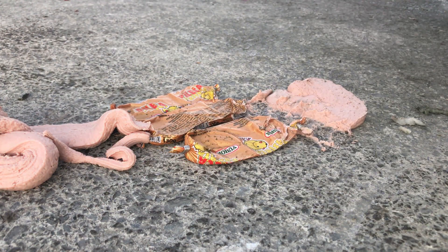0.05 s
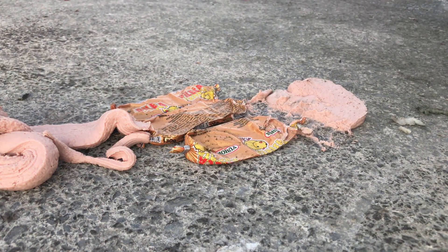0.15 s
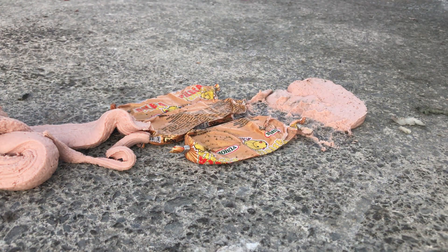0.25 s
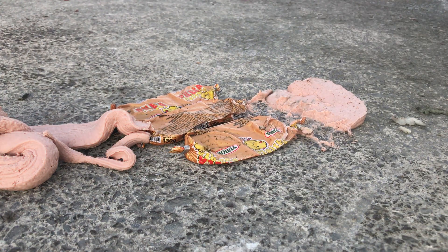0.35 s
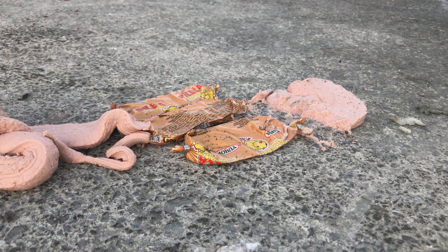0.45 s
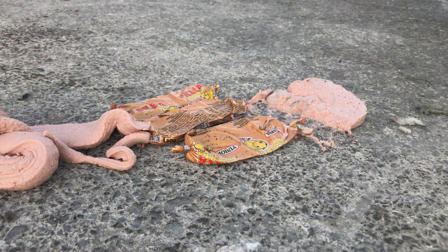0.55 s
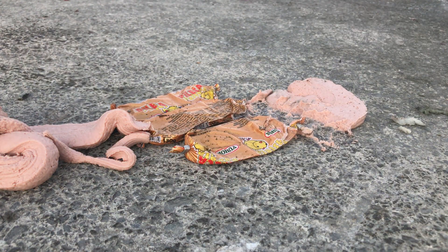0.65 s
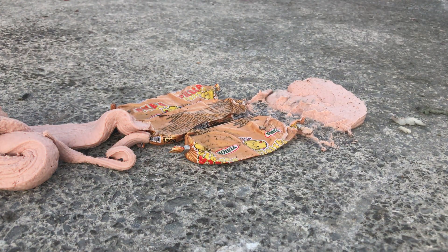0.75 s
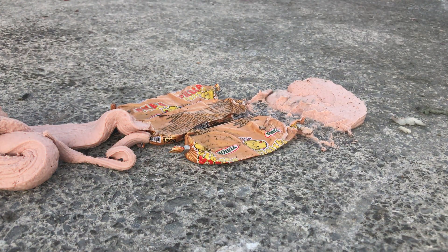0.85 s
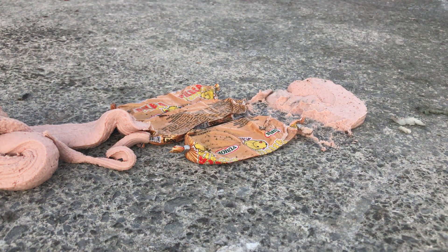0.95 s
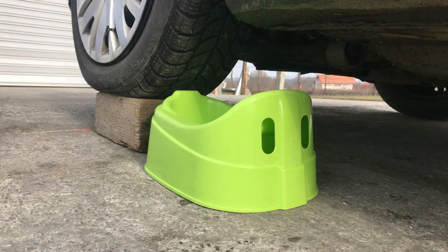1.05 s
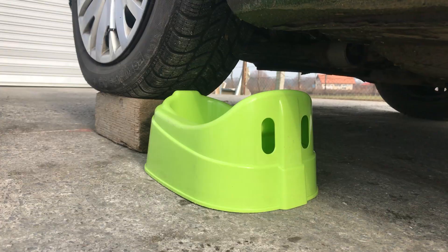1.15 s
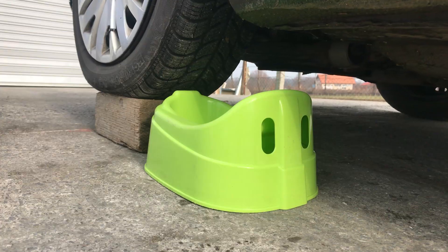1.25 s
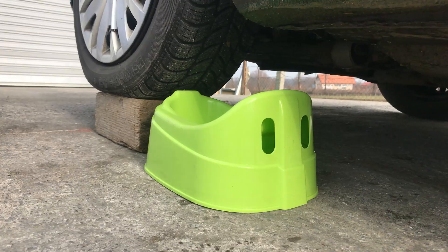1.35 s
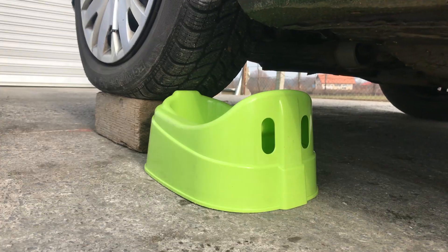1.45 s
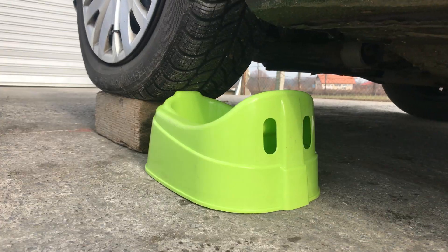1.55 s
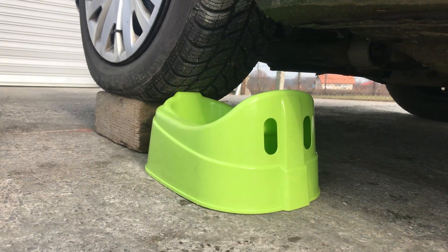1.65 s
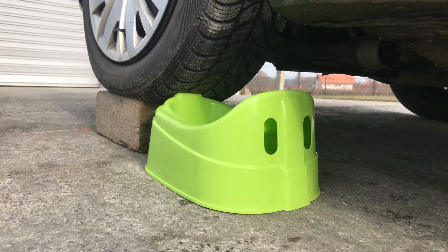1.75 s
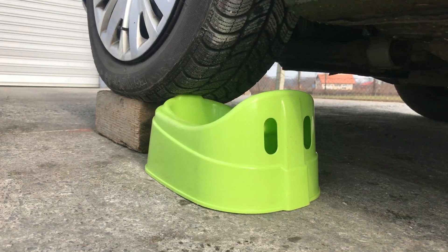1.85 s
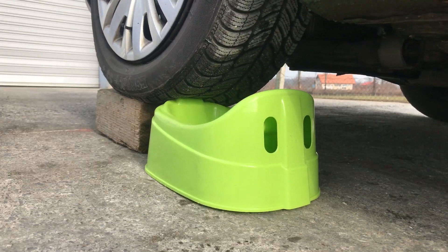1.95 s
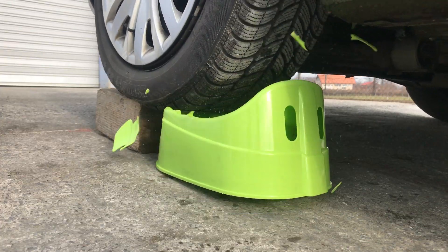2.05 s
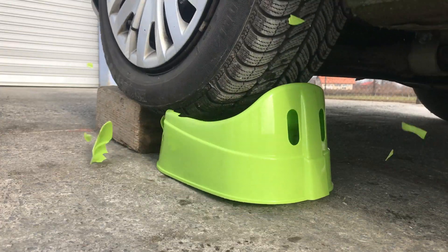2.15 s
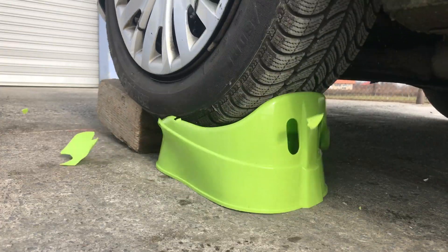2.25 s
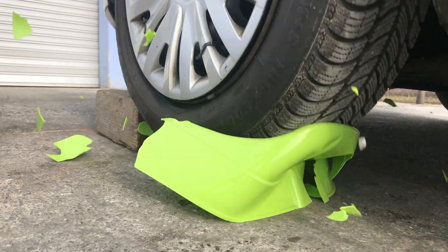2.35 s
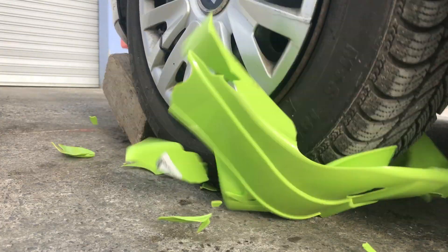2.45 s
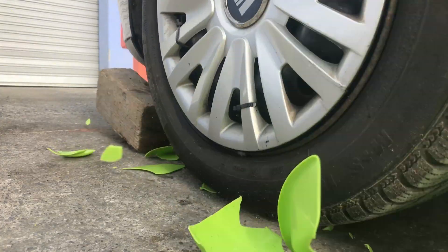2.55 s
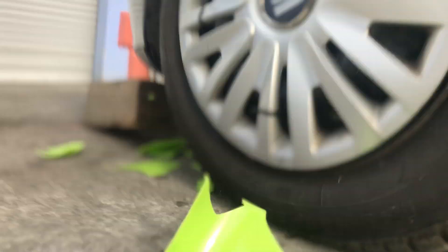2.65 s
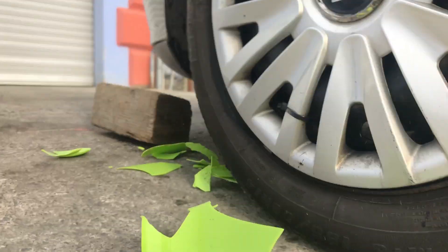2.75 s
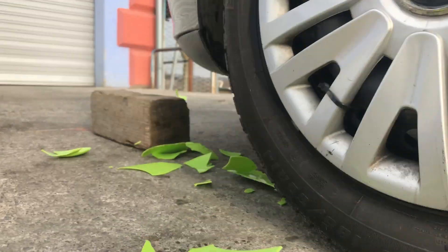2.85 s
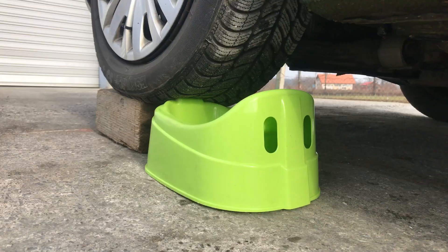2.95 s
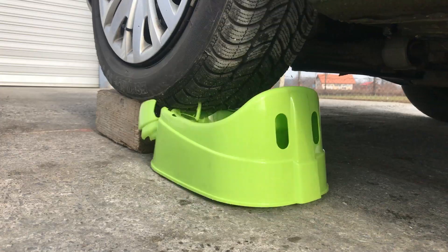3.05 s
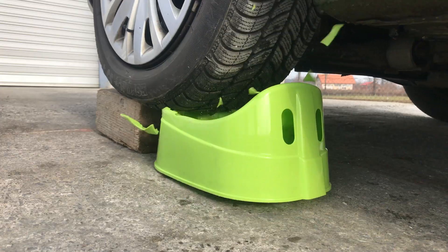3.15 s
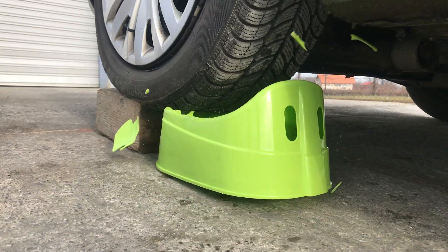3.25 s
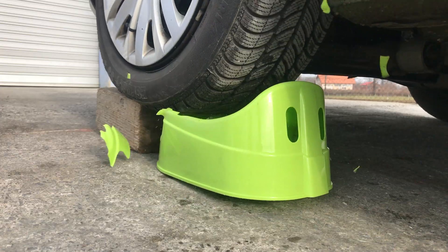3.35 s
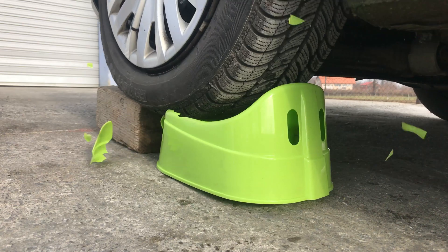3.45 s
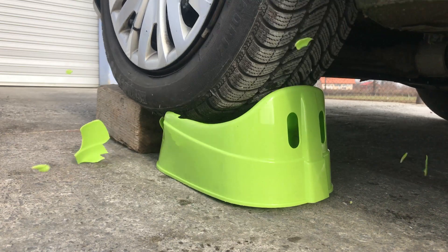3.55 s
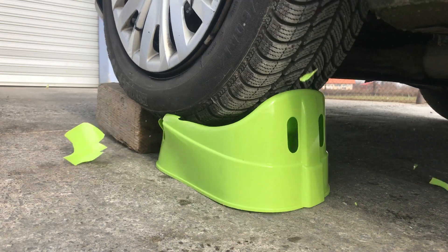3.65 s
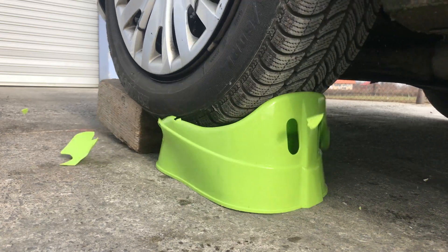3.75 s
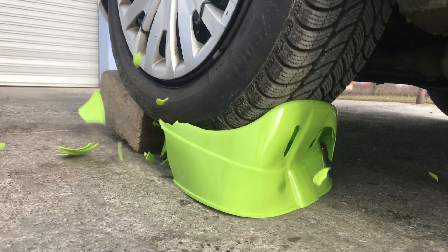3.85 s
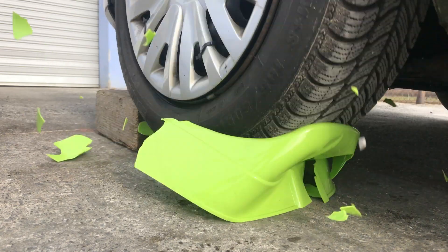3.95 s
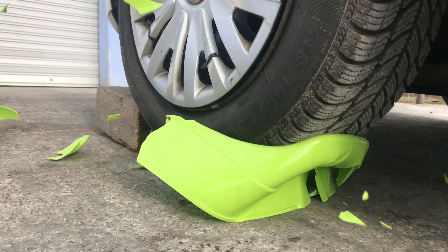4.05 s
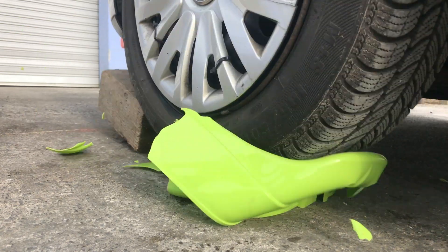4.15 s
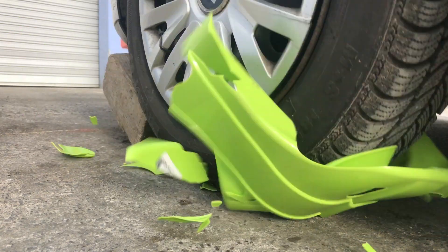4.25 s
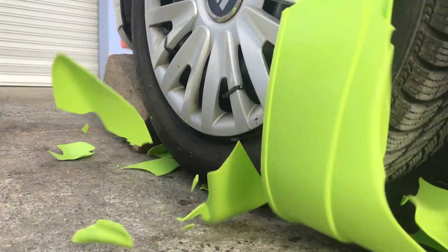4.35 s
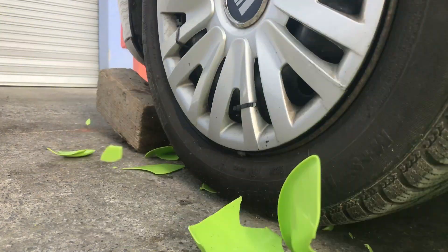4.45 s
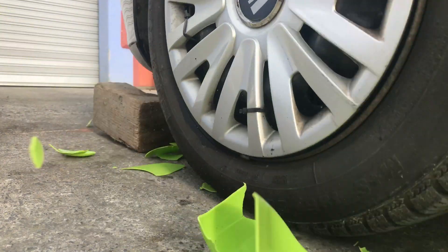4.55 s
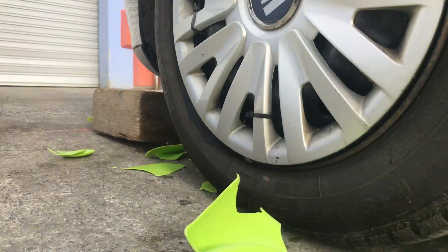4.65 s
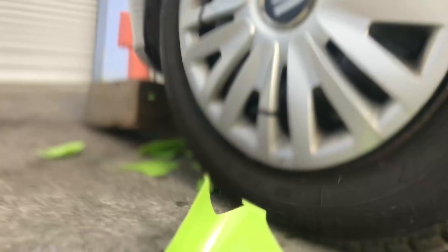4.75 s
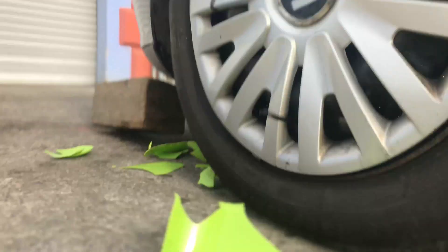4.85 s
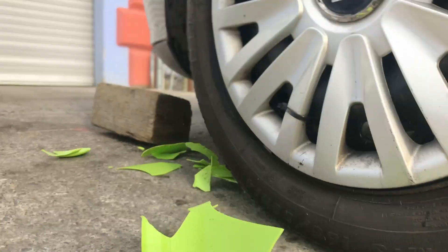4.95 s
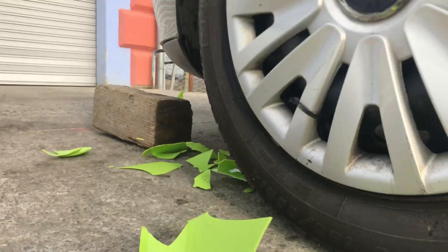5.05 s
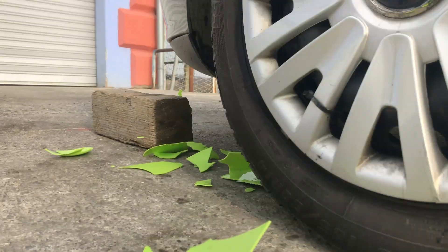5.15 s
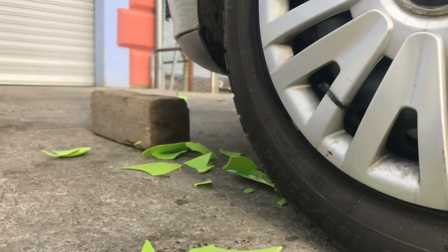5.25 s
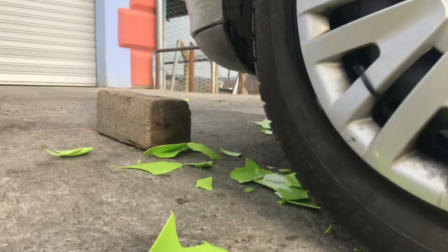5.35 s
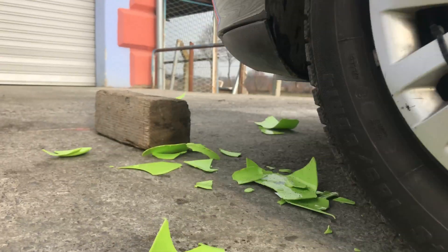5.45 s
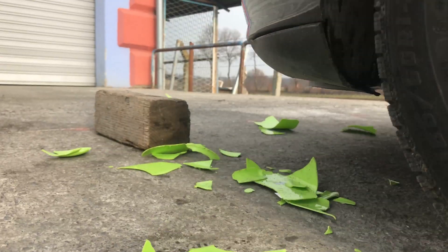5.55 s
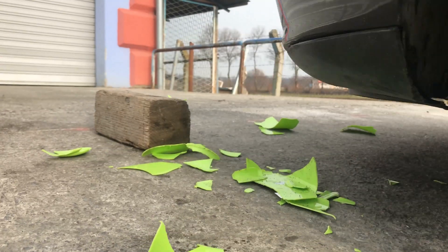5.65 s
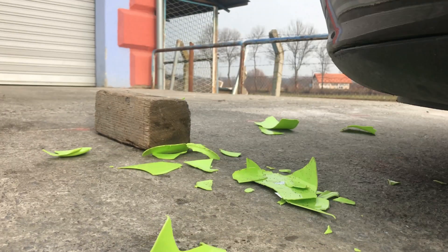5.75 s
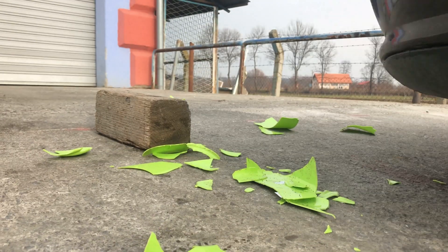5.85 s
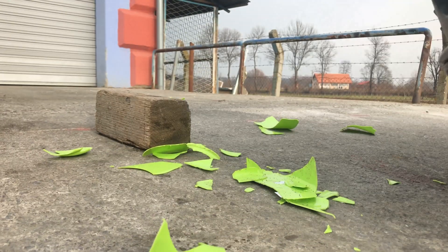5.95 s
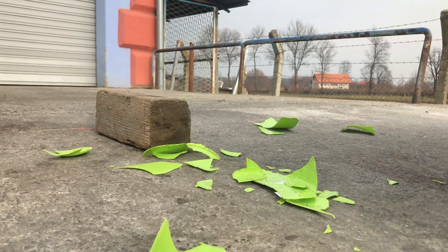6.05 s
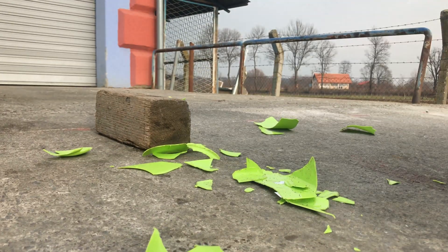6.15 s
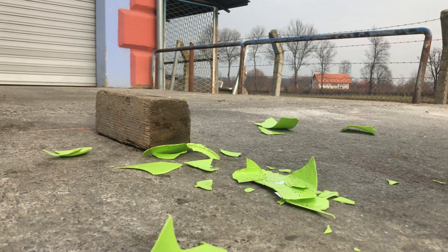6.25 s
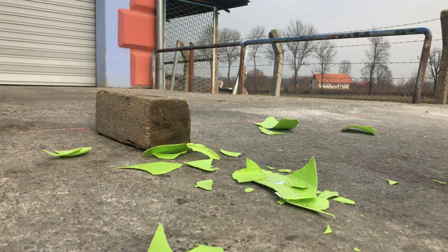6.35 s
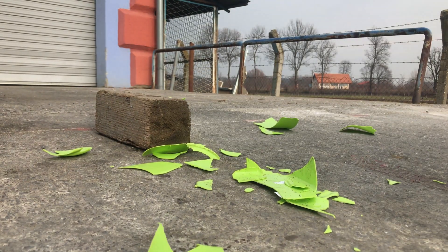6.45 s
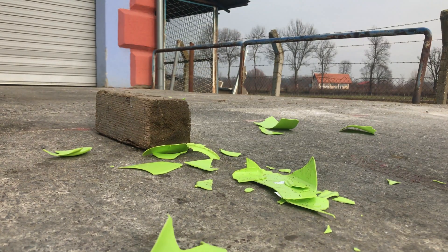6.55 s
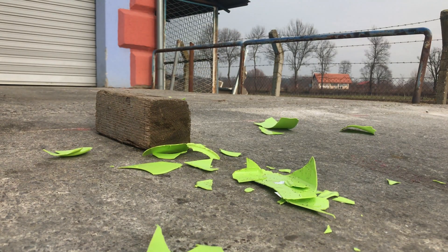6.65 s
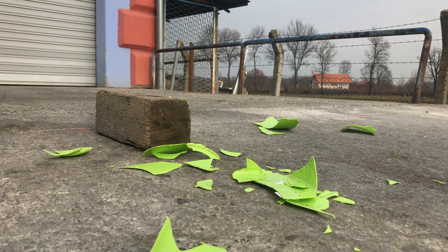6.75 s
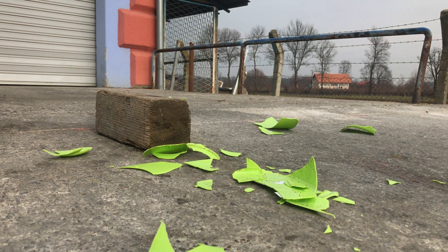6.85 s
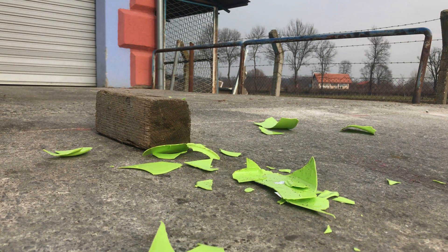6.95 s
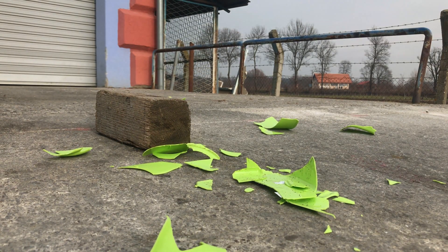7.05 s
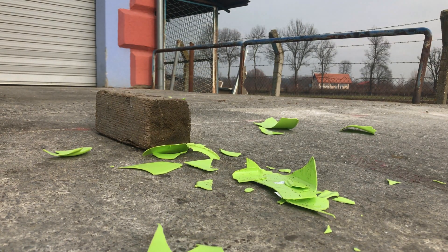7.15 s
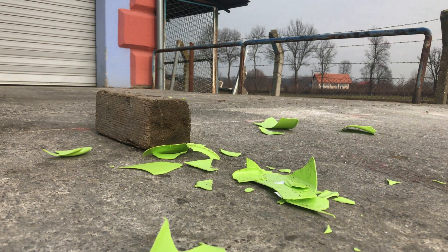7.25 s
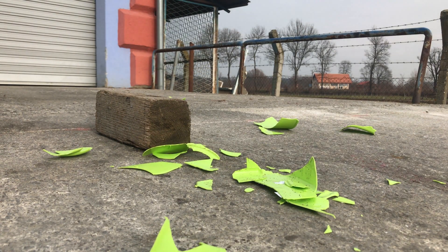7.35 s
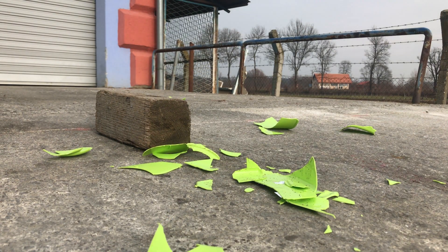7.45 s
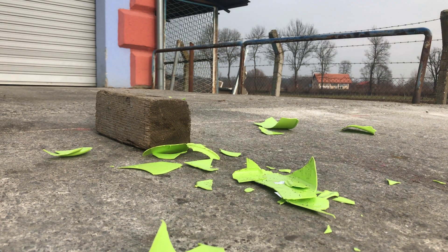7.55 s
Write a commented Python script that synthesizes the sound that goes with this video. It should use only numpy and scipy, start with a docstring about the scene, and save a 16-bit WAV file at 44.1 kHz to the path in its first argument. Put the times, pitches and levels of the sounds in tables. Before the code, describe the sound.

For the first 1.1 seconds a low, even engine hum sits near gritty concrete, with faint crunching and a few stone ticks, strongest just before the cut. The engine then turns uneven and rumbling. Around 1.7 a hollow plastic tub gives a dull creak and knocks. From 2.1 to 2.7 it shatters under the tyre: a loud pop, air thumps, dense sharp cracks, tearing and bright splinters, with short reverberation beneath the car, thinning to small ticks by 2.95. From 3 to 5.4 the same break returns slowed to less than half speed, darker and deeper, its crashes drawn out between about 3.2 and 4.6. Around 5.8 a hollow tyre roar swells over outdoor air and engine; shards snap and crunch, flatter and duller, until 6.5. Roar and idle gradually fade, with isolated stone ticks, until about 7.6.

```python
"""A hollow plastic tub on concrete breaks under a car rolling off a block: it buckles, splits and shatters.
Fractures are noise bursts through random plastic resonances; popping walls and pushed air are damped sines.
First comes a short shot of gritty ground with the engine humming nearby; grit and splinters are random spikes and ticks.
The break is replayed slower and lower; then the tyre rolls over the shards and the engine idles on.
Engine: two wandering partials plus rumble. Outdoor air and the tyre's roar: coloured noise."""
import sys
import numpy as np
from scipy import signal
from scipy.fft import rfft, irfft, next_fast_len
from scipy.io import wavfile
from scipy.ndimage import uniform_filter1d, minimum_filter1d, map_coordinates

SR = 44100
rng = np.random.default_rng(int(sys.argv[2]) if len(sys.argv) > 2 else 0)


def digitize_waveform(pressure):
    """Quantize a signal to 16-bit integers and store it at the path in sys.argv[1].

    Rows of a 2-D input are taken as channels; values are limited to [-1, 1].
    """
    field = np.atleast_2d(pressure).T
    bounded = np.clip(field, -1, 1)
    quanta = np.round(bounded * 32767).astype(np.int16)
    wavfile.write(sys.argv[1], SR, quanta)


N = 335846
CUT_S = 1.12  # end of the first shot
REPLAY_FROM_S, REPLAY_TO_S, REPLAY_SOURCE_S, REPLAY_SPEED = 2.9582, 5.39, 1.991, 0.4


def amp(db):
    """dB to gain."""
    return 10 ** (np.asarray(db) / 20)


def unit(x):
    """x at rms 1."""
    return x / np.sqrt(np.mean(x ** 2) + 1e-20)


def seconds(size):
    """Time of each sample [s]."""
    return np.arange(size) / SR


def along(points, hz):
    """Interpolate (frequency [Hz], value) points on a log frequency axis."""
    point_hz, value = np.transpose(points)
    return np.interp(np.log(hz + 1), np.log(point_hz + 1), value)


def wobble(rate_hz):
    """Smooth random curve, rate_hz knots a second."""
    knots = rng.standard_normal(int(N * rate_hz / SR) + 4)
    return map_coordinates(knots, [np.arange(N) * rate_hz / SR])


def filtered(x, response):
    """x times a response of frequency."""
    size = next_fast_len(N + SR // 2)
    hz = np.fft.rfftfreq(size, 1 / SR)
    return irfft(rfft(x, size) * response(hz), size)[:N]


def coloured(x, spectrum):
    """x weighted by the given spectrum, at rms 1."""
    return unit(filtered(x, lambda hz: amp(along(spectrum, hz))))


def low_passed(x, edge_hz):
    """Steep but smooth cut above the edge."""
    return filtered(x, lambda hz: 1 / (1 + (hz / edge_hz) ** 90))


def add(track, start_s, sound):
    """Mix a sound into the track at start_s."""
    part = track[round(start_s * SR):][:len(sound)]
    part += sound[:len(part)]


def spikes(size, rate_hz, spread_db):
    """Random tiny breaks, rate_hz a second, a few much larger than the rest; rms 1."""
    size_db = spread_db * np.minimum(rng.exponential(size=size), 4)
    sizes = amp(size_db) * rng.choice([-1, 1], size)
    return unit(sizes * (rng.random(size) < rate_hz / SR))


def swell_db(start_s, end_s, rise_db_per_s, fall_db_per_s):
    """Attack, hold at 0 dB from start to end, release."""
    t = seconds(N)
    return -rise_db_per_s * np.maximum(start_s - t, 0) - fall_db_per_s * np.maximum(t - end_s, 0)


# tyre bearing on grit and splinters; row 1: bare gritty ground, then: creeping off the block, rim splitting,
# tub flattened, settling on the wreck, dragging shards, rolling away
# (start [s], end [s], grit level [dB], splinter level [dB], fade after end [dB/s])
TYRE_LOADS = [(0, 0.07, -56.5, -59, 8), (1.72, 2.078, -65.5, -82, 100), (2.115, 2.317, -48, -48, 100),
              (2.36, 2.627, -40, -31, 152), (2.773, 5.478, -61, -50, 79), (5.81, 6.34, -49.5, -48.5, 72),
              (5.406, 6.505, -52, -75, 10.5)]


def crunch_levels(rise_db_per_s=501.5):
    """Grit and splinter levels [dB]: both follow the tyre's load; the first stretch ends at the cut."""
    levels = []
    for start_s, end_s, grit_db, splinter_db, fade_db_per_s in TYRE_LOADS:
        swell = swell_db(start_s, end_s, rise_db_per_s, fade_db_per_s)
        levels.append(swell + np.array([[grit_db], [splinter_db]]))
    first, *later = levels
    return np.where(seconds(N) < CUT_S, first, np.max(later, axis=0))


# weighting of gritty rolling (frequency [Hz], level [dB])
GRIT_SPECTRUM = [(40, -28.5), (150, -6), (320, -2), (450, -10), (620, 5), (1400, 1.5), (3500, -5.5),
                 (7000, -14), (15000, -25)]


def rolling(roll_db, clump_db=2, patch_db=4):
    """Grit crunches in clumps under the tread; short random bands stand out, as dragged shards ring."""
    z = signal.stft(spikes(N, rate_hz=3500, spread_db=2.0), nperseg=256)[2]
    patches = uniform_filter1d(rng.standard_normal(z.shape), size=3, axis=0)  # across frequency
    patches = uniform_filter1d(patches, size=6, axis=1)  # across time
    scrape = signal.istft(z * amp(patch_db * unit(patches)), nperseg=256)[1][:N]
    return amp(roll_db + clump_db * wobble(45)) * coloured(scrape, GRIT_SPECTRUM)


def splinters(debris_db, centre_hz=2700, spread_octaves=0.5, mode_octaves=0.59, t60_cycles=7,
              size_db=5.5, count=3500):
    """Small splinters tick at random moments, each with four damped modes scattered around its own pitch."""
    start = rng.integers(0, N, (count, 1))
    pitch_hz = centre_hz * 2 ** (spread_octaves * rng.standard_normal((count, 1)))
    size = amp(size_db * np.minimum(rng.exponential(size=(count, 1)), 4))
    t = seconds(size=220)
    ticks = np.zeros((count, len(t)))
    for offset in rng.standard_normal(size=(4, count, 1)):
        hz = np.minimum(pitch_hz * 2 ** (mode_octaves * offset), SR / 3)
        sign = rng.choice([-1, 1], (count, 1))
        ticks += sign * np.sin(2 * np.pi * hz * t) * amp(-60 * hz * t / t60_cycles)
    positions = start + np.arange(len(t))
    shower = np.bincount(positions.ravel(), (size * ticks).ravel(), N)[:N]
    return amp(debris_db) * unit(shower)


def firing(hz, drift, waver_db, overtone_db=-14):
    """Low note of a four-cylinder engine at idle: two partials, wandering in pitch and level; rms about 1."""
    phase = 2 * np.pi * np.cumsum(hz * (1 + drift * wobble(5.5))) / SR
    note = np.sin(phase) + amp(overtone_db) * np.sin(2 * phase)
    return unit(note) * amp(waver_db * wobble(12))


# weighting of exhaust rumble (frequency [Hz], level [dB])
RUMBLE_SPECTRUM = [(15, -5), (30, -13), (60, -0.5), (110, -0.5), (200, -19.5), (320, -10.5), (800, -55)]
# overall engine level (time [s], level [dB])
ENGINE_LEVELS = [(0, -48.5), (.4, -47.5), (.8, -42.5), (1.3, -48.5), (2.05, -48.5), (2.85, -71.5),
                 (5.6, -65.5), (5.87, -44.5), (6.2, -46.5), (7.62, -54.5)]


def engine(near_db=0, near_rumble_db=-10, labouring_db=-6, labouring_rumble_db=-2):
    """Firing note plus exhaust rumble: even idle in the first shot, uneven under load after it."""
    engine_db = np.interp(seconds(N), *np.transpose(ENGINE_LEVELS))
    rumble = coloured(rng.standard_normal(N), RUMBLE_SPECTRUM)
    steady = firing(hz=59.2, drift=0.003, waver_db=0.8)
    near = amp(near_db) * steady + amp(near_rumble_db) * rumble
    uneven = firing(hz=64.3, drift=0.018, waver_db=4.0)
    labouring = amp(labouring_db) * uneven + amp(labouring_rumble_db) * rumble
    return amp(engine_db) * np.where(seconds(N) < CUT_S, near, labouring)


# weighting of outdoor air and roar (frequency [Hz], level [dB])
AIR_SPECTRUM = [(30, -15), (200, 10), (400, 1.5), (1200, 0), (2200, -13), (4000, -22), (7000, -24.5),
                (10000, -29), (16000, -26.5)]
AIR_DB = -54.5
ROAR_PEAK_S, ROAR_DB, ROAR_RISE_DB_PER_S, ROAR_FALL_DB_PER_S = 5.85, -45.5, 26, 7.5


def yard(flutter_db=-1.07):
    """Outdoor air; after the replay the tyre's hollow roar, swelling and fading as it passes."""
    roar_db = ROAR_DB + swell_db(ROAR_PEAK_S, ROAR_PEAK_S, ROAR_RISE_DB_PER_S, ROAR_FALL_DB_PER_S)
    level_db = np.where(seconds(N) < REPLAY_TO_S, AIR_DB, roar_db)
    return amp(level_db + flutter_db * wobble(6.5)) * coloured(rng.standard_normal(N), AIR_SPECTRUM)


def swing(hz, rise_s, t60_s):
    """Damped low mode that swells over the rise, then decays."""
    t = seconds(size=12000)
    envelope = np.minimum(t / rise_s, 1) * amp(-60 * np.maximum(t - rise_s, 0) / t60_s)
    return np.sin(2 * np.pi * hz * t) * envelope


# shell walls popping through, or dull knocks (time [s], level [dB], pitch [Hz], t60 [s])
WALL_POPS = [(.114, -28, 319, 0.027), (1.122, -37.5, 220, 0.11), (1.660, -21, 377, 0.057),
             (1.676, -25.5, 711, 0.086), (1.684, -19, 218, 0.069), (2.078, -23, 676, 0.043),
             (2.0885, -4.5, 610, 0.023), (2.1765, -12.5, 537, 0.012), (2.3275, -17.5, 810, .014),
             (2.4255, -10, 664, 0.013), (2.7645, -28.5, 948, .025), (6.652, -39, 287, 0.033)]
# air pushed out as the shell gives way (time [s], level [dB], pitch [Hz])
AIR_THUMPS = [(2.096, -13, 83.5), (2.11, -8, 61.3), (2.369, -8.5, 78), (2.401, -16, 108.2),
              (2.441, -14, 67.9), (2.494, -22.5, 83), (2.54, -13.5, 90), (2.561, -15, 98.5),
              (2.618, -17, 60), (2.668, -26, 62)]


def buckling(rise_per_t60=0.15):
    """Walls pop through with a hollow note; the collapsing tub pushes out air."""
    out = np.zeros(N)
    for s, db, hz, t60_s in WALL_POPS:
        add(out, s, amp(db) * swing(hz, rise_per_t60 * t60_s, t60_s))
    for s, db, hz in AIR_THUMPS:
        add(out, s, amp(db) * swing(hz, rise_s=0.005, t60_s=0.034))
    return out


def release(t60_s, click=0.49, flutter=0.88, rise_s=0.00052, usual_t60_s=0.023):
    """One sharp release, then dense, quickly damped modes; energy 1."""
    t = seconds(size=3000)
    force = rng.standard_normal(len(t)) * amp(-60 * t / t60_s) * (1 - np.exp(-t / rise_s))
    # short t60: a piece pinned under the tyre is nearly all click
    force *= flutter * t60_s / usual_t60_s / np.linalg.norm(force)
    force[0] += click
    return force / np.linalg.norm(force)


# base response of a piece (frequency [Hz], level [dB])
PIECE_SPECTRUM = [(30, -26), (120, -4.5), (280, -1.5), (550, 1), (1300, 1), (2500, -1), (4200, -0.5),
                  (7000, -2), (10500, -4.5), (14000, -2), (19000, -1.5)]


def shard(force, ring_hz, ring_db, body_db, fizz_db, ring_width=0.25, modes_db=3, size=4096):
    """A piece answers a force: one main resonance, low body, treble fizz and random small modes."""
    hz = np.fft.rfftfreq(size, 1 / SR)
    tilt = along([(650, body_db), (1600, 0), (3200, 0.003), (9000, fizz_db), (16000, 1.57 * fizz_db)], hz)
    ring = ring_db * np.exp(-0.5 * (np.log((hz + 1) / ring_hz) / ring_width) ** 2)
    knots_hz = np.geomspace(300, SR / 2, 40)
    # no two pieces have the same shape
    modes = modes_db * np.interp(hz, knots_hz, rng.standard_normal(len(knots_hz)))
    response_db = along(PIECE_SPECTRUM, hz) + tilt + ring + modes
    cepstrum = irfft(np.log(amp(response_db)))
    cepstrum[1:size // 2] *= 2  # minimum phase: nothing sounds before the break
    cepstrum[size // 2 + 1:] = 0
    impulse = irfft(np.exp(rfft(cepstrum)))
    return signal.fftconvolve(force, impulse)


# stones ticking on concrete (time [s], level before gain [dB], ring [Hz])
STONE_TICKS = [(0.1158, -37, 560), (0.2012, -44, 1000), (.332, -41.5, 1990), (.76, -52, 2800),
               (0.8253, -48, 1900), (1.0488, -30, 1420), (1.0683, -35, 1540), (6.6192, -41, 1520),
               (6.6772, -44, 1290), (6.85, -41.5, 1360), (7.3917, -46, 1265)]


def pebbles(ring_db=14, ring_width=0.3, body_db=2, fizz_db=-19, t60_s=0.013, gain_db=22.0):
    """Small stones tick with one broad ring and little treble."""
    out = np.zeros(N)
    for s, db, hz in STONE_TICKS:
        tick = shard(release(t60_s), hz, ring_db, body_db, fizz_db, ring_width)
        add(out, s, amp(db + gain_db) * tick)
    return out


def volley(t, rate_hz, spread_db, t60_s, count=5):
    """Tiny fractures shared among a few pieces, each with its own short ring; rms 1."""
    rings = rng.standard_normal((count, len(t))) * amp(-60 * t / t60_s)
    total = np.zeros(len(t))
    for ring in rings:
        total += signal.fftconvolve(spikes(len(t), rate_hz / count, spread_db), ring)[:len(t)]
    return unit(total)


def running_crack(length_s, release_t60_s=0.035, fade_db=4):
    """A volley of tiny fractures that weakens as the stress is let go."""
    t = seconds(size=3500)
    stress_db = fade_db * (0.5 - t / length_s) - 60 * np.maximum(t - length_s, 0) / release_t60_s
    return volley(t, rate_hz=1800, spread_db=2.5, t60_s=0.011) * amp(stress_db)


CREAK_S, CREAK_LENGTH_S, CREAK_DB, CREAK_HZ = 1.661, 0.028, -31, 393


def creak(ring_db=2, body_db=24, fizz_db=-16):
    """The unbroken tub slips under the load: a short dull volley through the whole hollow shell."""
    out = np.zeros(N)
    slip = shard(running_crack(CREAK_LENGTH_S), CREAK_HZ, ring_db, body_db, fizz_db)
    add(out, CREAK_S, amp(CREAK_DB) * slip)
    return out


# a stronger break frees a larger piece: more body, less distinct ring (dB per dB above usual)
USUAL_DB, BODY_PER_DB, RING_PER_DB = -15, 0.2577, -0.21
# shards pressed flat on the concrete sound duller
FLAT_FROM_S, FLATTEN_S, FLAT_BODY_DB, FLAT_FIZZ_DB = 5.33, 0.94, 5, -12


def piece_tone(s, db, ring_db, body_db, fizz_db):
    """Ring, body and fizz [dB] of a piece, from the strength of its break and how flat it is pressed."""
    size_db = db - USUAL_DB
    flat = np.clip((s - FLAT_FROM_S) / FLATTEN_S, 0, 1)
    return (ring_db + RING_PER_DB * size_db,
            body_db + BODY_PER_DB * size_db + FLAT_BODY_DB * flat,
            fizz_db + FLAT_FIZZ_DB * flat)


# running cracks, ground shards (time [s], length [s], level [dB], ring [Hz])
CRACK_RUNS = [(2.071, 0.017, -29, 704), (2.096, 0.031, -7.5, 1630), (2.125, 0.021, -21.5, 1360),
              (2.151, .015, -21.5, 645), (2.365, .019, -17, 4420), (2.384, 0.028, -5, 565),
              (2.417, .011, -19, 810), (2.432, .005, -21, 680), (2.456, 0.007, -33, 570),
              (2.533, 0.0047, -9.5, 716), (2.542, 0.017, -16, 680), (2.5647, .016, -6.5, 1540),
              (2.585, 0.029, -25, 1020), (5.406, .025, -34.5, 640), (5.782, 0.011, -27, 700),
              (5.872, 0.017, -31.5, 1720), (5.883, 0.0095, -19, 5700), (5.901, 0.018, -36, 785),
              (5.94, 0.011, -28.5, 328), (5.993, 0.011, -24.5, 1300), (6.01, 0.024, -37, 1360),
              (6.051, 0.025, -30.5, 4050), (6.104, 0.022, -28.5, 4200), (6.259, 0.03, -28, 1600),
              (6.331, 0.0055, -33, 1720), (6.369, 0.05, -39, 890)]


def tears(ring_db=5, body_db=1.0, fizz_db=-7):
    """Cracks run through the tub, and later through its shards."""
    out = np.zeros(N)
    for s, length_s, db, hz in CRACK_RUNS:
        tone = piece_tone(s, db, ring_db, body_db, fizz_db)
        add(out, s, amp(db) * shard(running_crack(length_s), hz, *tone))
    return out


# single fractures (time [s], level before gain [dB], ring [Hz], t60 [s])
FRACTURES = [(2.0932, -3.5, 1200, 0.03), (2.142, -17.5, 570, 0.021), (2.1645, -21.5, 1000, 0.031),
             (2.2097, -20, 480, .033), (2.2266, -32, 762, 0.095), (2.255, -28, 1445, 0.035),
             (2.2833, -7.5, 1309, 0.049), (2.2899, -15.5, 4500, 0.095), (2.3264, -21, 951, 0.07),
             (2.362, -2.5, 1450, 0.067), (2.3823, -11, 452, 0.076), (2.4248, -20.5, 743, 0.04),
             (2.4398, -7.5, 700, 0.031), (2.4534, -15.5, 2390, 0.081), (2.4908, -6.5, 567, 0.041),
             (2.5102, -13, 700, 0.026), (2.5238, -20, 640, 0.067), (2.5406, -3.5, 1950, 0.015),
             (2.592, -11.5, 1140, 0.018), (2.6171, -8.5, 1635, 0.024), (2.6498, -33.5, 5850, 0.022),
             (2.6685, -21.5, 3250, 0.012), (2.6955, -22, 922, .027), (2.738, -39, 2050, .03),
             (2.767, -30, 994, 0.046), (2.7906, -34.5, 1096, 0.065), (2.803, -31, 4350, .012),
             (2.8342, -21.5, 3310, 0.031), (2.8785, -33.5, 3565, 0.025), (2.8856, -30, 2400, .022),
             (2.9307, -34.5, 2920, 0.017), (2.9504, -35, 756.5, 0.049), (2.9596, -31, 5740, 0.0076),
             (5.3937, -29.5, 6320, 0.0071), (5.4382, -34, 6300, 0.027), (5.4651, -26, 600, 0.12),
             (5.5353, -30, 4114, 0.025), (5.563, -29, 410, .02), (5.797, -26.5, 4100, 0.03),
             (5.8965, -22, 620, 0.021), (6.1468, -27.5, 4090, 0.02), (6.2393, -16, 4600, 0.014),
             (6.2781, -18.5, 1540, 0.013), (6.295, -23.5, 1286, 0.027), (6.3076, -27, 455, 0.027),
             (6.3599, -27, 1620, 0.02), (6.4545, -32, 720, 0.038)]


def snaps(ring_db=6.0, body_db=0.0, fizz_db=-5, gain_db=23.0):
    """Each snap lets go of one piece of plastic at once."""
    out = np.zeros(N)
    for s, db, hz, t60_s in FRACTURES:
        tone = piece_tone(s, db, ring_db, body_db, fizz_db)
        add(out, s, amp(db + gain_db) * shard(release(t60_s), hz, *tone))
    return out


# reverberation under the car (frequency [Hz], t60 [s])
UNDERBODY_T60 = [(100, 0.22), (400, 0.21), (1000, 0.097), (3000, 0.15), (8000, 0.19), (16000, 0.17)]


def underbody(x):
    """Short reverberation between the car's floor and the concrete: noise decaying per frequency."""
    hz, t, z = signal.stft(rng.standard_normal(SR // 3), SR, nperseg=256)
    decay = amp(-60 * t / along(UNDERBODY_T60, hz)[:, None])
    tail = signal.istft(z * decay, SR, nperseg=256)[1]
    delayed = np.pad(tail / np.linalg.norm(tail), (SR // 300, 0))
    return signal.fftconvolve(x, delayed)[:N]


def scene(wet_db=-15):
    """Plastic and grit sound under the car; the engine and the yard lie behind them."""
    grit_db, debris_db = crunch_levels()
    tub = creak() + snaps() + tears() + buckling()
    crush = tub + pebbles() + splinters(debris_db) + rolling(grit_db)
    return crush + amp(wet_db) * underbody(crush) + engine() + yard()


def limited(x, size=60, ceiling=0.7):
    """A limiter ducks around the loudest peaks."""
    gain = ceiling / np.maximum(np.abs(x), ceiling)
    return x * uniform_filter1d(minimum_filter1d(gain, size), size)


def record(dry):
    """The limited sound; in the middle the break is played again slowly, and so lower."""
    live = low_passed(limited(dry), edge_hz=18750)
    t = seconds(N)
    source_s = REPLAY_SOURCE_S + (t - REPLAY_FROM_S) * REPLAY_SPEED
    slow = map_coordinates(live, [source_s * SR], order=5)
    slow = low_passed(slow, REPLAY_SPEED * SR / 2)
    replaying = (t > REPLAY_FROM_S) & (t < REPLAY_TO_S)
    return low_passed(np.where(replaying, slow, live), edge_hz=16100)


dry = scene()
out = record(dry)
digitize_waveform(out)
```